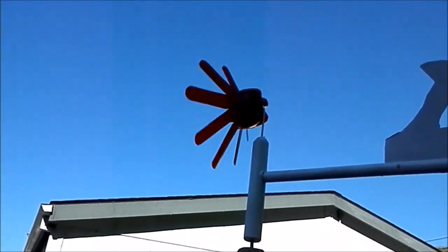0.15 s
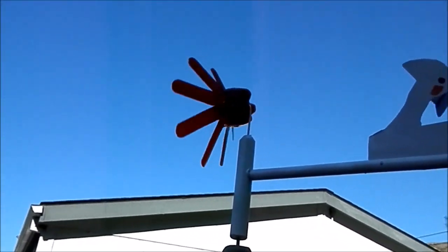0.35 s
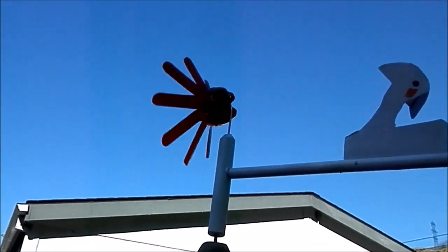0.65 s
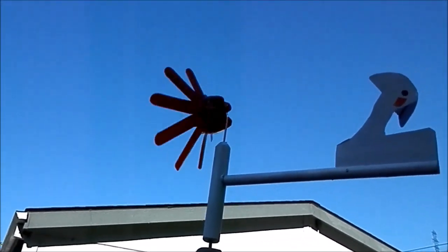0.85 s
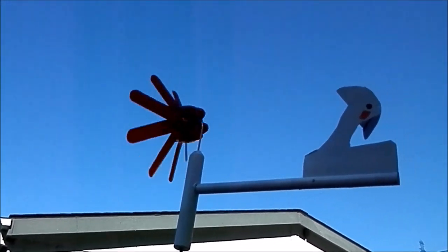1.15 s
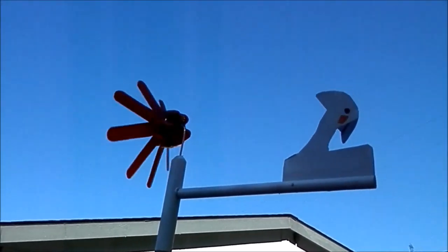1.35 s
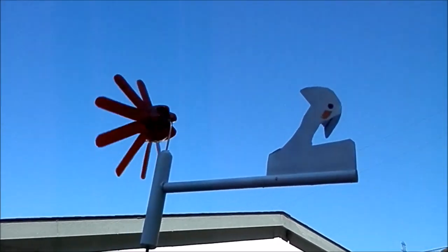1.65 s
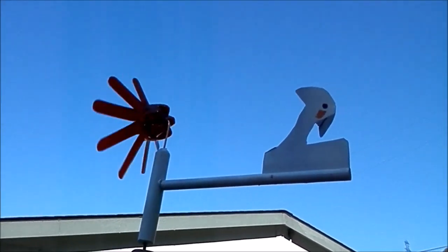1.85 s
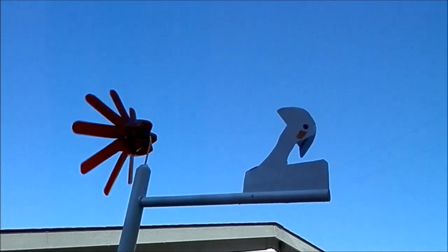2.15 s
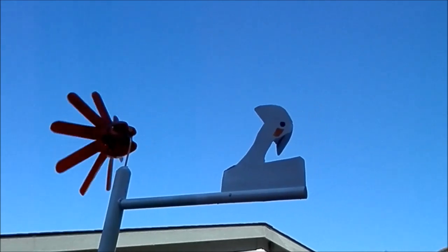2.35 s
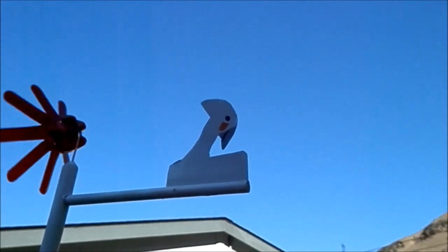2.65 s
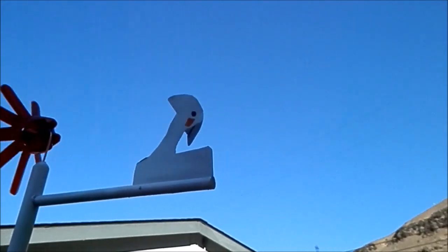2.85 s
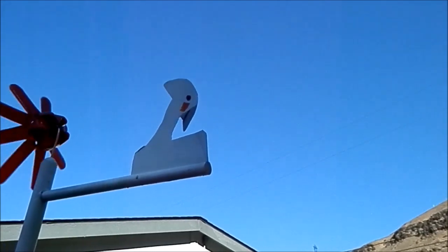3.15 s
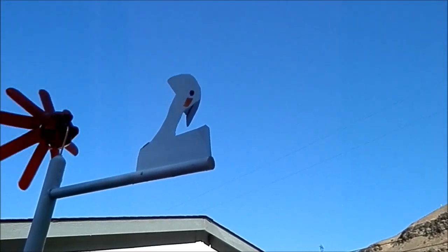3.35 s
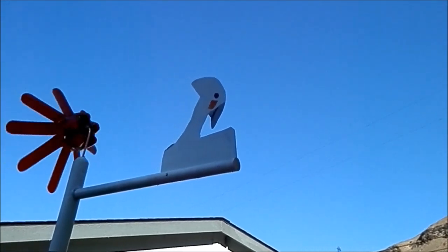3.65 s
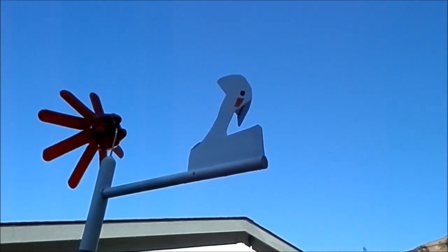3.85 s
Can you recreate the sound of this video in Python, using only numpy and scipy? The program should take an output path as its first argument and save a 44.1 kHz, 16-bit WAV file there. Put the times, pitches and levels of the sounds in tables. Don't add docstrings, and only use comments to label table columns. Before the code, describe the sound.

A metal whirligig propeller chatters on its loose hub outdoors, bright irregular ticks and a faint hollow tube hum; after about two seconds knocks grow harder and wind gusts thump the close microphone.

```python
import sys
import numpy as np
from scipy import signal
from scipy.fft import rfft, irfft, next_fast_len
from scipy.io import wavfile
from scipy.ndimage import map_coordinates

SR = 44100
rng = np.random.default_rng(int(sys.argv[2]) if len(sys.argv) > 2 else 0)


def output_pcm(signal):
    pcm = np.clip(np.atleast_2d(signal).T, -1, 1) * 32767
    wavfile.write(sys.argv[1], SR, np.round(pcm).astype(np.int16))


def how_loud(loudness_db):
    steps = np.asarray(loudness_db, float) / 20
    return 10 ** steps


N = 176400


def propeller():
    bout, bright_bout = chatter_bouts()
    play, hum_db = light_play()
    turned, away = turning(1.57), turning(3.04)
    out, edge, all_ticks = np.zeros(N), np.zeros(N), np.zeros(N)
    for point, ticks in enumerate(hub_ticks()):
        tap = taps(point)
        knock_train, bright_train = knocks(point)
        knock = bursts(knock_train, t60=0.018)
        scrape = shaft_scrape()

        loose = (ticks + scrape) * (bout + play)
        treble = filtered(loose, lambda hz: hz > 5200)
        low = loose - 0.49 * away * treble + knock + tap
        out += hub_ring(low, away)

        ripple_db = 4 * rng.standard_normal(12)
        bright_knock = bursts(bright_train, t60=0.018)
        high = ticks * (bright_bout + play * how_loud(-6.5 * turned)) + bright_knock + how_loud(5.5) * tap
        out += frame(low, point, ripple_db)
        out += struts(low, turned, away)
        out += blades(high, turned)

        edge += ticks * bout * how_loud(-6.5 * away) + how_loud(13) * (tap + knock / 2)
        all_ticks += (ticks + 2.32 * scrape) * (bout / bout.mean() + 1.65)
    return out + blade_edges(edge) + tube_hum(all_ticks, hum_db)


def turning(middle_s):
    width_s = 0.46
    return (1 + np.tanh((np.arange(N) / SR - middle_s) / width_s)) / 2


# start_s, length_s, level_db, blade_brightness_db
CHATTER = [(0.001, 0.024, -58.5, 14), (.048, 0.019, -69.5, 20), (.12, 0.01, -76, 23),
           (.159, 0.005, -66, 19), (.175, 0.047, -59, 14), (.23, 0.023, -69, 8), (.27, 0.046, -76.5, 13.5),
           (.336, 0.064, -59.5, 11.5), (.43, 0.048, -67, 8), (.486, .095, -60.5, 12.5),
           (.597, 0.14, -71.5, 15), (.74, 0.038, -70, 17), (.79, 0.038, -68, 12.5), (.903, .11, -63.5, 13),
           (1.03, 0.046, -71.5, 15.5), (1.1, .17, -67, 10), (1.3, 0.049, -67.5, 14.5),
           (1.36, 0.091, -60.5, 6.5), (1.5, 0.023, -60.5, 6.5), (1.572, 0.051, -59.5, 4.5),
           (1.667, 0.12, -66, 7.5), (1.73, 0.02, -74, -3), (1.762, 0.031, -60, 9.5), (1.81, 0.035, -76, 3)]
# start_s, length_s, level_db, blade_brightness_db
WINDY_CHATTER = [(1.922, 0.13, -66, 1), (2.092, 0.033, -54.5, 3.5), (2.136, 0.058, -69, -23),
                 (2.255, 0.05, -61.5, 5), (2.321, 0.13, -65.5, 1), (2.462, 0.034, -56, 4),
                 (2.551, 0.048, -57.5, -6), (2.625, 0.052, -59.5, 5), (2.697, 0.065, -59, 0),
                 (2.766, 0.03, -51.5, -19), (2.822, 0.013, -57, -18), (2.934, 0.068, -66, 6),
                 (3.033, 0.096, -68.5, -2), (3.286, 0.039, -67.5, 8), (3.486, 0.046, -60.5, -22),
                 (3.695, 0.029, -54.5, -17), (3.749, 0.034, -61.5, -13.5), (3.803, 0.1, -66, -28),
                 (3.877, 0.16, -65, -15)]


def chatter_bouts():
    rise_s, fall_s = 0.0018, 0.022
    t = np.arange(N) / SR
    plain, bright = np.zeros(N), np.zeros(N)
    for start_s, length_s, level_db, bright_db in CHATTER + WINDY_CHATTER:
        rise = np.clip((t - start_s) / rise_s + 1, 0, 1)
        fall = np.clip((start_s + length_s - t) / fall_s + 0.5, 0, 1)
        plain += how_loud(level_db) * rise * fall
        bright += how_loud(level_db + bright_db) * rise * fall
    return plain, bright


# start_s, level_db, tube_hum_db (above level)
LIGHT_PLAY = [(0.0, -61.5, 3.5), (0.4, -66, 9.5), (0.57, -68.5, 7.5), (1.0, -66, 5.5), (1.37, -64.5, 10),
              (1.7, -64.5, 4), (1.96, -62.5, 11.5), (1.99, -65, 6), (2.61, -63.5, 8.5), (2.93, -61.5, -0.5),
              (3.05, -64.5, 6.5), (3.16, -70, 4), (3.27, -67.5, 8.5), (4.0, -63.5, 5)]


def light_play():
    play_db, hum_db = curves(LIGHT_PLAY)
    return how_loud(play_db - 3.5), play_db + hum_db


def hub_ticks():
    ticks_per_s, jitter = 160, 0.6
    count = int(N / SR * ticks_per_s) - 1
    moments = np.arange(count) + 0.5 + jitter * rng.uniform(-1, 1, count)
    at = (moments / ticks_per_s * SR).astype(int)
    size = how_loud(4 * np.clip(rng.standard_normal(count), -3, 1.1))
    where = rng.integers(0, 5, size=count)
    for point in range(5):
        train = np.bincount(at, size * (where == point), minlength=N)
        yield unit(bursts(train, t60=0.022)) / 2


def shaft_scrape():
    return how_loud(-6 + 2.17 * wobble(29.99)) * rng.standard_normal(N) / 2


# start_s, peak_db, blade_brightness_db
HARD_KNOCKS = [(0.048, -52, 1), (0.158, -38, 12), (0.175, -41, 11), (0.337, -56, -4), (0.466, -41, -15),
               (0.4857, -42, 18), (0.501, -41, 14), (0.5533, -37.5, 4), (0.5961, -33, 10), (0.6615, -39, 8),
               (0.7613, -35.5, 16.5), (0.793, -55, -7), (0.9048, -37, 14), (0.9684, -39.5, 23),
               (1.667, -30.5, 6), (1.9818, -35, 5), (2.093, -42, -2), (2.1446, -29.5, -11.5),
               (2.2604, -38, 7), (2.3303, -28.5, -13), (2.6286, -32.5, 5), (2.6605, -27.5, -7),
               (2.7902, -27, 5), (2.923, -51, -7), (3.5163, -27.5, -3), (3.5613, -34.5, -6),
               (3.5938, -30.5, -13), (3.6932, -24, 0.5), (3.8044, -31.5, -13), (3.8814, -23.5, 1.5)]


def knocks(point):
    level_db = -14
    dull, bright = np.zeros(N), np.zeros(N)
    for start_s, peak_db, bright_db in HARD_KNOCKS[point::5]:
        i = round(start_s * SR)
        dull[i] = how_loud(peak_db + level_db)
        bright[i] = how_loud(peak_db + bright_db + level_db)
    return dull, bright


# start_s, peak_db
LIGHT_TAPS = [(0.1241, -53), (0.145, -54), (0.189, -37), (0.2189, -43.5), (0.2493, -50), (0.2695, -54),
              (0.348, -48), (0.3623, -41), (0.3747, -42.5), (0.392, -36.5), (0.4314, -51), (0.4577, -51),
              (0.53, -49), (0.5586, -43), (0.623, -53), (0.68, -47.5), (0.7127, -49), (0.7549, -41.5),
              (0.814, -45), (0.9544, -47), (1.106, -49.5), (1.2448, -48), (1.3023, -51), (1.343, -48.5),
              (1.3612, -42.5), (1.3992, -45.5), (1.4404, -44), (1.4694, -48), (1.503, -60), (1.5728, -44),
              (1.6102, -60), (1.6925, -45.5), (1.736, -41.5), (1.7668, -36.5), (1.7994, -47),
              (1.8377, -51.5), (1.9467, -41.5), (1.9924, -43)]
# start_s, peak_db
WINDY_TAPS = [(2.026, -49), (2.0745, -51), (2.0915, -48), (2.112, -42), (2.1734, -64), (2.1817, -49.5),
              (2.2084, -47), (2.2289, -51), (2.2802, -45), (2.3158, -53), (2.3357, -43), (2.365, -48),
              (2.3735, -49.5), (2.392, -44), (2.4379, -48), (2.4623, -46), (2.5516, -55), (2.7024, -53),
              (2.726, -47), (2.7736, -50), (2.7947, -39.5), (2.819, -48), (2.828, -47.5), (2.8599, -63),
              (2.8742, -46.5), (2.8913, -50), (2.9372, -48), (2.9517, -48), (2.98, -42), (2.9866, -43),
              (3.024, -48), (3.107, -62), (3.124, -48.5), (3.1585, -58), (3.1727, -55), (3.1931, -58),
              (3.2284, -58), (3.2924, -54), (3.337, -50.5), (3.3778, -53.5), (3.432, -51), (3.462, -50.5),
              (3.4924, -48), (3.508, -62), (3.5216, -52), (3.5974, -52), (3.623, -56), (3.6556, -55),
              (3.6676, -47.5), (3.7043, -49), (3.717, -55), (3.7509, -61.5), (3.8347, -55), (3.856, -58.5),
              (3.9516, -52.5), (3.976, -50), (3.9858, -52)]


def taps(point):
    train = np.zeros(N)
    for start_s, peak_db in (LIGHT_TAPS + WINDY_TAPS)[point::5]:
        train[round(start_s * SR)] = how_loud(peak_db - 1)
    return bursts(train, t60=0.011)


# pitch_hz, width_hz, level_db
HUB_TONES = [(1910, 510, -4), (4860, 135, 0.5), (6250, 210, -8)]


def hub_ring(low, away):
    return how_loud(1.5) * filtered(away * low, modes(HUB_TONES, spread_db=6))


# pitch_hz, width_hz, level_db
FRAME_TONES = [(1412, 47, -11.5), (1762, 33, -4), (2345, 170, -23.5), (2996, 76, -3.5), (3750, 100, -19),
               (4750, 56, -8.5)]
# pitch_hz, level_db
CRACK_COLOUR = [(800, -16.5), (2500, 1), (4000, 1), (5500, -5.5), (9000, 3.5), (11500, -9.5), (14500, -3),
                (16000, -8)]


def frame(low, point, ripple_db):
    ring = modes(FRAME_TONES, spread_db=6.5)
    crack = colour(CRACK_COLOUR)
    ripple_hz = np.linspace(0, 16500, num=len(ripple_db))

    def response(f):
        dulling_db = 5.5 * point * f / 20000
        crack_db = -5 - dulling_db + np.interp(f, ripple_hz, ripple_db)
        return 5 * how_loud(-7) * ring(f) + how_loud(crack_db) * crack(f)

    return filtered(low, response)


# pitch_hz, width_hz, level_db
STRUT_TONES = [(2771, 30, -2), (3336, 58, 0)]


def struts(low, turned, away):
    level_db = -5.5 + 2 * (turned - 2 * away)
    driven = how_loud(3.9 * wobble(8)) * low
    return 5 * how_loud(level_db) * filtered(driven, modes(STRUT_TONES, spread_db=2.0))


# pitch_hz, width_hz, level_db
BLADE_TONES = [(6190, 420, -14), (7840, 173, -1.5), (8550, 198, -3.5), (9090, 620, -10)]


def blades(high, turned):
    hidden_db = -7.5
    hidden = [(hz, width, db + hidden_db * (k == 1)) for k, (hz, width, db) in enumerate(BLADE_TONES)]
    facing = filtered((1 - turned) * high, modes(BLADE_TONES, spread_db=3.25))
    aside = filtered(turned * high, modes(hidden, spread_db=3.25))
    return 4 * how_loud(-7) * (facing + aside)


def blade_edges(edge):
    facing_s, width_s = 1.8, 0.27
    off_centre = (np.arange(N) / SR - facing_s) / width_s
    return how_loud(-22 - np.minimum(off_centre ** 2, 9)) * filtered(edge, lambda hz: hz > 11140)


# pitch_hz, width_hz, level_db
TUBE_TONES = [(454.8, 29.5, -6.5), (484, 18.9, 4.5), (539, 20.7, -1.5), (617, 29, -8.5), (736.5, 60.5, -12),
              (910.5, 49, -14.5), (1102, 62, -13)]


def tube_hum(all_ticks, hum_db):
    sway = np.pi / 4 * (1 + np.tanh(wobble(3.195)))
    hum = np.zeros(N)
    for share in (np.cos(sway), np.sin(sway)):
        driven = share * how_loud(2.17 * wobble(14)) * all_ticks
        hum += unit(filtered(driven, modes(TUBE_TONES, spread_db=2.5)))
    return how_loud(hum_db) * unit(hum)


# start_s, strength_db
GUSTS = [(0.0, -62.5), (1.39, -63.5), (1.48, -54), (1.9, -59.5), (2.09, -37), (2.22, -46), (2.31, -36),
         (2.37, -54.5), (2.46, -40.5), (2.77, -37.5), (2.81, -27), (2.9, -55), (3.0, -30), (3.07, -45.5),
         (3.31, -48), (3.33, -40), (3.84, -36), (4.0, -72)]
# pitch_hz, level_db (per Hz)
RUMBLE_COLOUR = [(12, -55), (20, 6), (49, 2.5), (87, 3), (201, -8), (348, -27), (400, -45), (520, -50),
                 (880, -120)]
# pitch_hz, level_db (per Hz)
SNAP_COLOUR = [(60, -24), (200, 12.5), (350, -2), (700, -16.5), (1500, -27.5)]


def gusts():
    strength_db, = curves(GUSTS)
    lumps = how_loud(7.5 * np.tanh(wobble(40)))
    unsteady = how_loud(2.45 * wobble(12))
    rumble_air = filtered(rng.standard_normal(N), colour(RUMBLE_COLOUR))
    rumble = unit(lumps ** 0.69 * unsteady * rumble_air)
    snap = unit(lumps ** 3.3 * filtered(rng.standard_normal(N), colour(SNAP_COLOUR)))
    snap_db = -18 + 2.41 * (strength_db + 39.0) - 41
    return how_loud(strength_db - 1.5) * rumble + how_loud(snap_db) * snap


# start_s, peak_db, pitch_hz (negative when it sucks first)
PRESSURE_SLAPS = [(1.495, -31.5, 58), (2.099, -29, 85), (2.298, -29, -64.5), (2.529, -26.5, 91),
                  (2.697, -26.5, -130), (2.725, -27.5, 88), (2.797, -21, 122), (2.817, -32, 63),
                  (2.98, -27, -77), (2.996, -23.5, -130), (3.336, -25.5, -73), (3.463, -23, 121),
                  (3.539, -27.5, -66), (3.633, -22.5, -120), (3.686, -26, -86), (3.775, -27, 86),
                  (3.86, -28, 98)]


def slaps():
    out, t = np.zeros(N + SR), np.arange(SR // 10) / SR
    for start_s, peak_db, pitch_hz in PRESSURE_SLAPS:
        cycles = t * abs(pitch_hz)
        swing = np.sin(2 * np.pi * cycles ** 0.93) * np.exp(-cycles / 0.61)
        onset = np.sin(np.pi / 2 * np.clip(cycles * 4, 0, 1)) ** 2
        i = round(start_s * SR)
        out[i:i + len(t)] += np.sign(pitch_hz) * how_loud(peak_db + 1.5) * swing * onset
    return out[:N]


# pitch_hz, level_db (per Hz)
FAR_COLOUR = [(20, 2.5), (100, -14.5), (230, 1), (400, -3), (800, -10), (1500, -22), (4000, -38),
              (12000, -53)]


def far_wind():
    unsteady = how_loud(2.74 * wobble(5.99))
    air = filtered(rng.standard_normal(N), colour(FAR_COLOUR))
    return how_loud(-63) * unit(unsteady * air)


def unit(x):
    return x / np.sqrt(np.mean(x ** 2) + 1e-20)


def curves(rows):
    start_s, *columns = np.transpose(rows)
    return [np.interp(np.arange(N) / SR, start_s, column) for column in columns]


def wobble(rate):
    knots = rng.standard_normal(int(N * rate / SR) + 4)
    return map_coordinates(knots, [np.arange(N) * rate / SR])


def bursts(train, t60):
    tail = how_loud(-60 * np.arange(SR // 20) / SR / t60)
    return signal.fftconvolve(train, tail)[:N] * rng.standard_normal(N)


def filtered(x, response):
    m = next_fast_len(N + SR // 2)
    return irfft(rfft(x, m) * response(np.fft.rfftfreq(m, 1 / SR)), m)[:N]


def colour(points):
    hz, db = np.transpose(points)
    return lambda f: how_loud(np.interp(np.log(f + 1), np.log(hz + 1), db, left=-120, right=-120))


def modes(table, spread_db):
    gains = how_loud(spread_db * rng.standard_normal(len(table)))
    shifts = 1 + 0.007 * spread_db / 6 * rng.standard_normal(len(table))

    def response(f):
        total = 0
        for k, (hz, width, db) in enumerate(table):
            ring = 1j * f * width / ((hz * shifts[k]) ** 2 - f * f + 1j * f * width)
            total = total + (-1) ** k * gains[k] * how_loud(db) * ring
        return total

    return response


def scene():
    return (propeller() + gusts() + slaps() + far_wind())[None]


def low_pass(x):
    return signal.sosfilt(signal.butter(12, 16470, fs=SR, output="sos"), x)


def record(dry):
    mix = filtered(dry[0], lambda hz: np.where(hz < 15850, 1, how_loud(-27)) * (hz < 16450))
    return low_pass(mix[None])


dry = scene()
out = record(dry)
output_pcm(out)
```